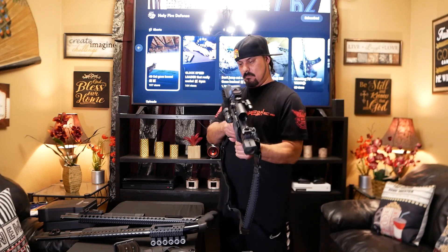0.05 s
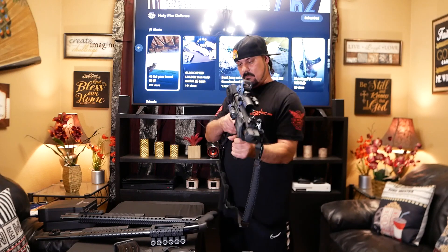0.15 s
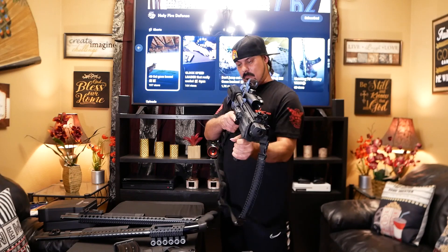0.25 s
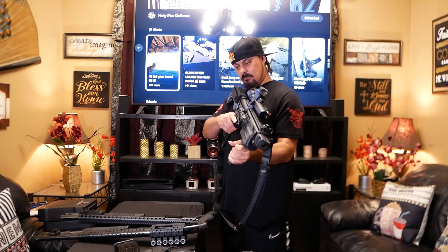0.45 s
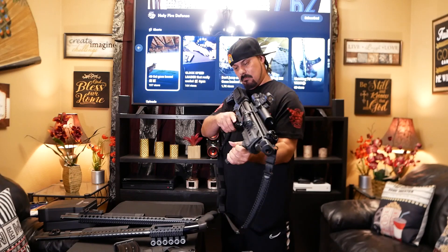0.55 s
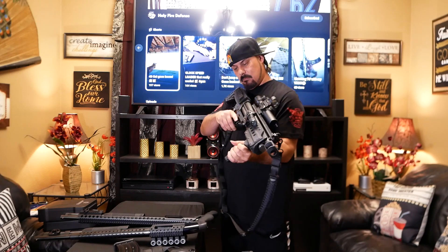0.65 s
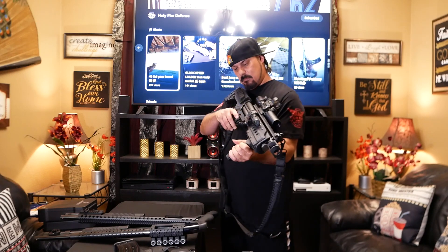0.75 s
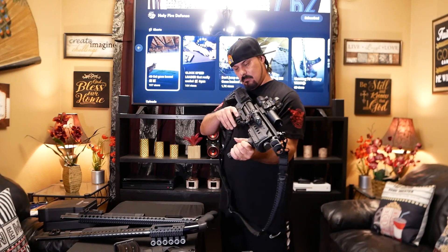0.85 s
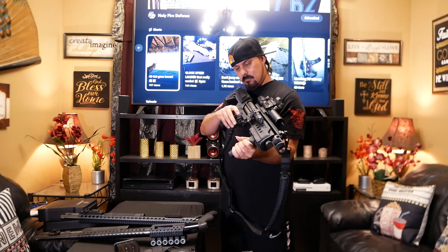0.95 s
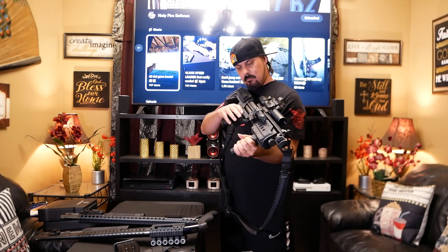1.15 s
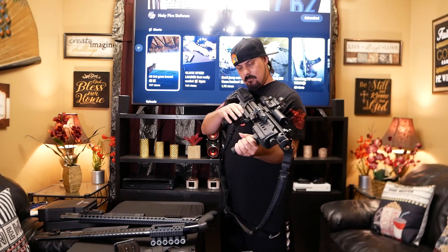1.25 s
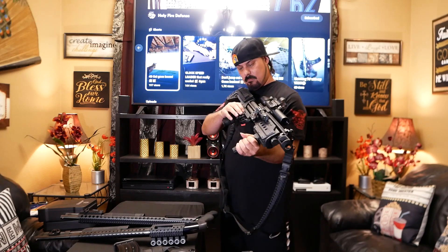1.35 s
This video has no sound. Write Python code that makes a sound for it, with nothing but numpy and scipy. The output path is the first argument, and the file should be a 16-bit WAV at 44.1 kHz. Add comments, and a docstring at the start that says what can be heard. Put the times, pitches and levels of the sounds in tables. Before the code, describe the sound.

A pump shotgun is racked once, close by. Light ticks at about 0.1 seconds lead into a quick run of sharp steel clacks and rasping slide from 0.2 seconds, with a hollow ring, ending in the loudest clack at 0.3. Soft ticks come near 0.6 and 0.75 seconds, then faint cloth and a soft knock around 1 second. A low electrical hum fills the small room throughout.

```python
"""A pump shotgun is racked in a living room: after a light tick, one quick run of clacks and sliding
ends in the loudest clack. Each clack cracks and rings the steel, the slide rasps in tiny slips, and air
in the tube sings a hollow note. Soft ticks, cloth and a knock on the stock follow as the grip shifts.
Mains hum and low air fill the room; a limiter ducks everything at the clacks and slowly recovers."""
import sys
import numpy as np
from scipy import signal
from scipy.fft import rfft, irfft, next_fast_len
from scipy.io import wavfile
from scipy.ndimage import uniform_filter1d, minimum_filter1d

SR = 44100
rng = np.random.default_rng(int(sys.argv[2]) if len(sys.argv) > 2 else 0)


def generate_wav(signal):
    """Clip the signal to [-1, 1] and save it as 16-bit WAV at the path in sys.argv[1]."""
    frames = np.transpose(np.atleast_2d(signal))
    scaled = np.clip(frames, -1, 1) * 32767
    pcm = np.round(scaled).astype(np.int16)
    wavfile.write(sys.argv[1], SR, pcm)


N = 61739

# partials of the mains hum: f/Hz, level/dB
HUM_PARTIALS = [(60, -45), (120, -66), (180, -67.5), (373, -73)]
# colour of the room's air in the centre: f/Hz, level/dB
AIR_EQ = [(25, -2), (35, -4), (50, -14), (90, -7), (140, -9), (250, -9), (380, -12.5), (600, -19.5),
          (1100, -23.5), (2000, -29.5), (5000, -32), (15000, -39)]
# colour of the room's air at the sides: f/Hz, level/dB
SIDE_AIR_EQ = [(25, -27.5), (60, 1), (130, 5.5), (250, -7.5), (500, -19.5), (1000, -22.5), (4000, -27.5),
               (15000, -29)]
# colour of the hiss: f/Hz, level/dB
HISS_EQ = [(100, 4), (1000, 1), (5000, 1.5), (9000, 0), (15000, -5)]
# early reflections off the near walls: delay/s, level/dB
WALL_ECHOES = [(.0032, -22.5), (.0125, -15.5), (.0162, -16), (.0205, -21.5)]
# reverb time of the room: f/Hz, t60/s
ROOM_DECAY = [(100, .25), (900, 0.3), (3500, 0.29), (6000, 0.31), (9000, .26), (15000, .21)]
# stereo width, how much the left and right pickups differ: f/Hz, level/dB
WIDTH_EQ = [(100, -15.5), (500, -25), (1000, -24), (2200, -35.5), (4500, -28.5), (8000, -18.5),
            (15000, -17.5)]
# sleeve and sling brushing the gun: t/s, level/dB, half length/s
BRUSHES = [(.745, -64.5, 0.057), (0.963, -60.5, 0.022), (1.08, -67.5, 0.0316)]
# colour of the cloth: f/Hz, level/dB
CLOTH_EQ = [(300, -2.5), (1500, -2), (4500, -0.5), (8000, -10), (15000, -18)]
# colour of a knock on the polymer stock: f/Hz, level/dB
STOCK_EQ = [(100, -12.5), (350, -23), (620, 12.5), (1050, 12), (1500, 3.5), (2200, -3), (5000, -18),
            (15000, -38)]
# light touches of the parts: t/s, level/dB, t60/s, low-pass f/Hz, hollow tone f/Hz, tone level/dB
TICKS = [(.0968, -38, 0.028, 4560, 960, -42.5), (.1168, -46.5, 0.067, 4380, 987, -41),
         (.1848, -41.5, 0.043, 5400, 990, -70), (.1938, -34, 0.057, 5000, 960, -40),
         (.5742, -30, 0.019, 4530, 1115, -36.5), (.5865, -39, 0.095, 3500, 1065, -54),
         (.7175, -49.5, 0.00976, 11990, 1093, -68), (.7595, -49.5, .01, 7130, 1500, -72),
         (.7695, -45, 0.011, 14000, 1500, -58), (.7805, -51, .02, 9000, 1094, -56.5)]
# colour of a light touch: f/Hz, level/dB
TICK_EQ = [(60, -11.5), (450, -9.5), (800, 1.5), (1400, 1), (1900, -4), (2500, 4.5), (3000, -4.5),
           (3800, 1), (5200, -4), (7000, -8), (15000, -12)]
# air ringing in the tube as the action moves: t/s, f/Hz, level/dB
TUBE_NOTE = [(0.192, 1000, -55.5), (0.209, 980, -29), (0.242, 986.8, -16), (0.269, 945, -12.5),
             (.293, 928.8, 1), (0.332, 920, -10), (.44, 853.4, -43.5), (.55, 938, -54), (.62, 878, -70)]
# push on the sliding action: t/s, level/dB
SLIDE_EFFORT = [(.195, -45.5), (.205, -31), (.217, -27), (.228, -17), (.247, -7.5), (.27, -4.5), (.29, -1),
                (.312, -2.5), (.326, -0.5), (.336, -28.5)]
# colour of steel rubbing steel: f/Hz, level/dB
SLIDE_EQ = [(60, -22.5), (400, -15.5), (700, 1), (1400, -0.5), (2000, -2.5), (3500, 7.5), (5500, -1.5),
            (7500, -3), (15000, -13)]
# ringing of the receiver and barrel: f/Hz, level/dB, t60/s
STEEL_MODES = [(921, -2, .13), (1449, 2.5, .15), (2682, 0, .17), (3090, -2.5, 0.14), (3358, 2.5, .16),
               (3635, -5.5, .17), (3710, 0, 0.22), (4308, -5, .17), (5216, -4.5, .19), (6054, -8, 0.14),
               (8580, -7.5, 0.13), (12096, -8.5, .14)]
# colour of steel hitting steel: f/Hz, level/dB
CLACK_EQ = [(40, -22), (200, -15.5), (450, -19.5), (700, -6), (1450, 3.5), (1950, -3.5), (2700, 5),
            (3500, 4.5), (5400, 1), (6700, -7.5), (10000, -10.5), (15000, -16)]
# hard contacts of the action: t/s, level/dB, t60/s, EQ bell f/Hz, bell gain/dB
CLACKS = [(.1990, -15.5, 0.014, 7600, 10.5), (0.2185, 5, 0.021, 4896, 13.5), (0.2329, 13, 0.016, 3800, 3),
          (0.2367, 17, 0.022, 3300, 6), (.2598, 8, .015, 7000, 6.5), (.2783, 5.5, .02, 4500, 2),
          (.2862, 8, .02, 13000, 8.5), (0.2985, 12, .018, 3600, 3.5), (0.3014, 16, .025, 4500, -5.5),
          (0.3057, 15, .025, 12000, 4.5), (0.3097, 21.5, 0.012, 3000, 0.5)]


def amp(db):
    """Decibels to gain."""
    return 10 ** (np.asarray(db) / 20)


def unit(x):
    """Scale to rms 1."""
    return x / np.sqrt(np.mean(x ** 2) + 1e-20)


def along(points, hz):
    """Read a curve of (f/Hz, value) points on a log frequency axis."""
    freqs, values = np.transpose(points)
    return np.interp(np.log(hz + 1), np.log(freqs + 1), values)


def clock():
    """Seconds at each sample."""
    return np.arange(N) / SR


def filtered(x, response):
    """Zero-phase EQ; response gives the gain at each frequency."""
    size = next_fast_len(N + SR // 2)
    return irfft(rfft(x, size) * response(np.fft.rfftfreq(size, 1 / SR)), size)[..., :N]


def noise(colour_db):
    """Noise of rms 1 with the given colour."""
    return unit(filtered(rng.standard_normal(N), lambda hz: amp(colour_db(hz))))


def strike(onset, t60, attack_s=.0003):
    """Envelope of a hit: fast attack, exponential decay."""
    age = np.maximum(clock() - onset, 0)
    return (1 - np.exp(-age / attack_s)) * np.exp(-np.log(1000) * age / t60)


def room_tone(air_db=-60):
    """The bed: steady mains hum over a low murk of air."""
    hum = sum(amp(db) * np.sqrt(2) * np.sin(2 * np.pi * (hz * clock() + rng.random()))
              for hz, db in HUM_PARTIALS)
    return hum + amp(air_db) * noise(lambda hz: along(AIR_EQ, hz))


def wall_echoes(x):
    """The near walls throw back short, quiet copies."""
    return sum(amp(db) * np.interp(clock() - delay, clock(), x, left=0) for delay, db in WALL_ECHOES)


def room_tail(x, bloom_s=.008):
    """Short diffuse reverb; the top end dies first."""
    hz, t, spectrum = signal.stft(rng.standard_normal(SR // 2), SR, nperseg=256)
    decay = np.exp(-np.log(1000) * t / along(ROOM_DECAY, hz)[:, None])
    impulse = signal.istft(spectrum * decay, SR, nperseg=256)[1]
    impulse *= 1 - np.exp(-np.arange(len(impulse)) / SR / bloom_s)
    return signal.fftconvolve(x, impulse / np.linalg.norm(impulse))[:N]


def stereo_side(x, spread_s=.0054, air_db=-66):
    """Side channel for a little width: a faint smeared copy of x, plus its own air."""
    scatter = rng.standard_normal(N) * np.exp(-clock() / spread_s)
    smeared = signal.fftconvolve(x, scatter / np.linalg.norm(scatter))[:N]
    air = amp(air_db) * noise(lambda hz: along(SIDE_AIR_EQ, hz))
    return filtered(smeared, lambda hz: amp(along(WIDTH_EQ, hz))) + air


def grip_shift(knock_s=.965, knock_db=-40):
    """A hand knocks softly on the polymer stock, and cloth swishes against the gun."""
    thump = amp(knock_db) * strike(knock_s, t60=.067, attack_s=.002374)
    knock = thump * noise(lambda hz: along(STOCK_EQ, hz))
    swells = sum(amp(db) * np.exp(-.5 * ((clock() - peak) / half) ** 2) for peak, db, half in BRUSHES)
    return knock + swells * noise(lambda hz: along(CLOTH_EQ, hz))


def ticks(hollow_t60=.1):
    """Light contacts make dull clicks and sound the gun's hollow parts."""
    out = np.zeros(N)
    for onset, db, t60, cutoff_hz, tone_hz, tone_db in TICKS:
        click = noise(lambda hz: along(TICK_EQ, hz) - 10 * np.log10(1 + (hz / cutoff_hz) ** 10))
        hollow = np.sin(2 * np.pi * tone_hz * (clock() - onset))
        out += amp(db) * click * strike(onset, t60, attack_s=.000067)
        out += amp(tone_db) * hollow * strike(onset, hollow_t60, attack_s=.001)
    return out


def tube_note(waver_hz=45, waver_rad=1.0):
    """Air rings in the tube: a wavering hollow note that sags as the action moves."""
    times, pitch_hz, db = np.transpose(TUBE_NOTE)
    waver = noise(lambda hz: -20 * np.log10(1 + (hz / waver_hz) ** 2))
    phase = 2 * np.pi * np.cumsum(np.interp(clock(), times, pitch_hz)) / SR + waver_rad * waver
    return amp(np.interp(clock(), times, db, left=-120, right=-120)) * np.sin(phase)


def slide(slips_per_s=6400, spread_db=3, dull_hz=6506, opens_db=5.5):
    """Steel rubs on steel in dense tiny slips, brighter the harder it is pushed."""
    slips = (rng.random(N) < slips_per_s / SR) * rng.choice([-1, 1], N)
    grit = slips * amp(spread_db * rng.standard_normal(N))
    rub = unit(filtered(grit, lambda hz: amp(along(SLIDE_EQ, hz))))
    body = filtered(rub, lambda hz: 1 / (1 + (hz / dull_hz) ** 4))
    effort_db = np.interp(clock(), *np.transpose(SLIDE_EFFORT), left=-120, right=-120)
    treble_db = opens_db * (effort_db - effort_db.max()) / 20  # fully open at the hardest push
    return amp(effort_db) * (body + amp(treble_db) * (rub - body))


def steel_ring(onset, spread_db=2):
    """The receiver and barrel ring in their modes, a little differently on every hit."""
    out = np.zeros(N)
    for hz, db, t60 in STEEL_MODES:
        envelope = amp(db + rng.normal(0, spread_db)) * strike(onset, t60)
        out += envelope * np.sin(2 * np.pi * (hz * clock() + rng.random()))
    return out


def clacks(bell_octaves=.26, ring_db=-34):
    """Each hard steel contact is a sharp crack with its own colour and a faint metallic ring."""
    out = np.zeros(N)
    for onset, db, t60, bell_hz, bell_db in CLACKS:
        bell = lambda hz: bell_db * np.exp(-.5 * (np.log2((hz + 1) / bell_hz) / bell_octaves) ** 2)
        crack = noise(lambda hz: along(CLACK_EQ, hz) + bell(hz)) * strike(onset, t60)
        out += amp(db) * (crack + amp(ring_db) * steel_ring(onset))
    return out


def scene(send_cutoff_hz=13000, tube_send_db=-3, tail_db=-12):
    """The gun dead centre in a furnished room, almost mono."""
    foley = clacks() + ticks() + slide() + grip_shift()
    note = tube_note()
    send = foley + amp(tube_send_db) * note
    send = filtered(send, lambda hz: 1 / np.sqrt(1 + (hz / send_cutoff_hz) ** 4))
    gun_in_room = foley + note + wall_echoes(send) + amp(tail_db) * room_tail(send)
    mid = gun_in_room + room_tone()
    side = stereo_side(gun_in_room)
    return np.array([mid + side, mid - side])


def record(dry):
    """A limiter clamps, holds and slowly lets go; then soft clipping, hiss and a steep low-pass."""
    threshold, hold_s, release_s, lookahead_s = 1.192, .089, .16, .0008
    clip_top, hiss_db, top_hz = .78, -77, 15500
    hold, ahead = int(hold_s * SR), int(lookahead_s * SR)
    over_db = 20 * np.log10(np.maximum(np.abs(dry).max(axis=0) / threshold, 1))
    held_db = -minimum_filter1d(-over_db, hold, origin=(hold - 1) // 2)  # highest recent overshoot
    release = np.exp(-clock() / release_s)
    duck_db = release * np.maximum.accumulate(held_db / release)  # jumps up, decays exponentially
    early_db = -minimum_filter1d(-duck_db, ahead)  # starts just ahead of the hit
    limited = dry * amp(-uniform_filter1d(early_db, ahead))
    rounded = limited / (1 + (limited / clip_top) ** 4) ** (1 / 4)
    hiss = amp(hiss_db) * noise(lambda hz: along(HISS_EQ, hz))
    return filtered(rounded + hiss, lambda hz: 1 / np.sqrt(1 + (hz / top_hz) ** 160))


dry = scene()
out = record(dry)
generate_wav(out)
```